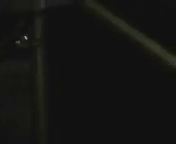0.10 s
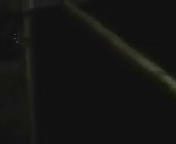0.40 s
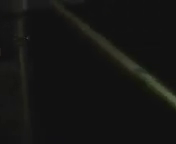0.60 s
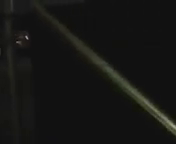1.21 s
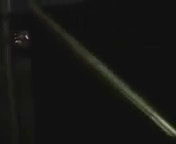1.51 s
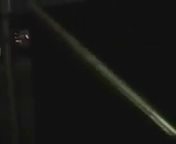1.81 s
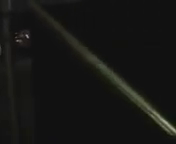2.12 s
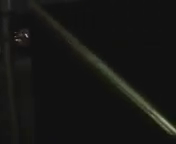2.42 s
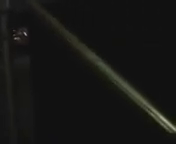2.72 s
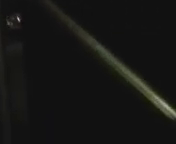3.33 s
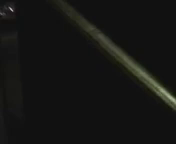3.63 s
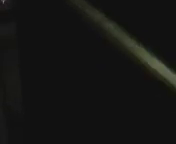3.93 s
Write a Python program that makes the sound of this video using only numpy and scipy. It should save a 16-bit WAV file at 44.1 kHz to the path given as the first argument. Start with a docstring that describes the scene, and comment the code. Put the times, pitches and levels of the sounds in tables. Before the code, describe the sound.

A motorised steel gate rolls along with rapid, irregular knocks and ringing clangs, a chattering chain, rumbling wheels and tiny squeaks. The motor's hum cuts out at about 0.8 seconds. The banging continues, weakening from 1.5 seconds, then settles into small clicks between 2 and 2.7 seconds, with a faint squeak near 2.4. A low distant outdoor rumble and thin, faint hiss remain until 4 seconds.

```python
"""A steel gate knocks and rings as an electric opener pulls it along, chain chattering, motor humming.
Each impact is a burst of noise that excites the damped modes of the frame and its fittings; chain links
ring on the sprocket, dry steel squeaks and the wheels rumble on their track. The motor cuts out,
the gate rolls on, bangs a few times and settles with small clicks and a squeak.
Nearby walls reflect the impacts. A low distant rumble and a thin, faint hiss remain."""
import sys
import numpy as np
from scipy import signal
from scipy.fft import rfft, irfft, next_fast_len
from scipy.io import wavfile
from scipy.ndimage import uniform_filter1d, minimum_filter1d, map_coordinates

SR = 44100
rng = np.random.default_rng(int(sys.argv[2]) if len(sys.argv) > 2 else 0)


def wav_record(signal):
    """Record a signal, one row per channel, as 16-bit PCM in the file named by sys.argv[1]."""
    frames = np.transpose(np.atleast_2d(signal))
    bounded = np.clip(frames, -1, 1)
    # unit amplitude maps onto the largest positive 16-bit level
    quanta = np.round(bounded * 32767).astype(np.int16)
    wavfile.write(sys.argv[1], SR, quanta)


N = 176400

# Impacts: t/s; relative level/dB of frame ring, thud, clang, edge, jingle, sparkle; nominal T60/s
IMPACTS = [(0.023, 3.5, -12, -7, -19.5, -16, -52, 0.082), (0.053, -19, -10, -35, -54, -13, -44, 0.058),
           (0.21, -0.5, -13, -15.5, -18.5, -15.5, -45, 0.11), (0.301, 1, -52, -19, -14, -22, -41, 0.037),
           (0.355, -5.5, -3.5, -9, -33, -16.5, -35, 0.065), (0.412, 0, -19, -10.5, -9.5, -13.5, -30, 0.063),
           (0.43, 2, -11, -28, -2.5, -19, -42, 0.014), (0.527, 3.5, -15, -8, -18, -17, -55, 0.037),
           (0.571, -12, -33, -10, -17, -23, -57, 0.05), (0.58, -4, -4.5, -8, -23, -17, -51, 0.077),
           (0.673, -2, -53, -14, -32, -23, -54, 0.068), (0.697, -2.5, -48, -2.5, -17.5, -34, -37, 0.036),
           (0.727, 5, -32, -19, -25, -15, -35, 0.13), (0.759, -16, -26, -7.5, -17.5, -28, -39, 0.076),
           (0.77, -12, -26, -9, -49, -12, -28, 0.039),
           (0.808, -10.5, -17.5, -14.5, -33, -19.5, -56.5, 0.091),
           (0.91, -2.5, -47, -13.5, -26, -31, -44, 0.063), (0.946, -1, -21, -14, -20, -21, -46, 0.065),
           (0.963, 0, -9, -10, -36, -20, -54, 0.067), (1.029, -4, -29, -9, -20, -14, -40, 0.078),
           (1.047, 5.5, -26, -12, -27, -18.5, -53, 0.071),
           (1.062, -11, -21, -13.5, -26.5, -16.5, -47, 0.08),
           (1.09, -6.5, -11.5, -23, -23, -22, -38, 0.091), (1.177, -4, -37, -16.5, -32, -33, -41, 0.19),
           (1.21, -27, -59, -10.5, -14.5, -17, -30, 0.044), (1.238, 6, -44, -10.5, -17, -13.5, -30.5, 0.12),
           (1.25, 1, -58, -7, -11, -19, -56, 0.057), (1.285, -5, -30, -36, -19.5, -15, -31, 0.06),
           (1.302, 0, -6.5, -6, -15.5, -14.5, -31, 0.077), (1.408, -2, -28, -13.5, -25, -41, -46, 0.075),
           (1.451, -7, -23, -14, -26, -43, -57, 0.051), (1.461, -16, -39, -30, -39, -29, -74, 0.06),
           (1.492, -4, -15, -8.5, -19, -23.5, -48, 0.1), (1.655, -9.5, -34, -14, -25.5, -66, -59, 0.073),
           (1.69, 0, -46, -5.5, -16.5, -13, -63, 0.044), (1.719, -14, -30, -16.5, -39, -22.5, -59, 0.15),
           (1.78, -12, -35, -24.5, -32, -18.5, -39, 0.13), (1.858, -13.5, -33, -18, -33, -40, -48, 0.038),
           (1.905, -8, -38, -23, -27.5, -23.5, -42, 0.12), (2.064, -15.5, -21, -28.5, -33, -28, -54, 0.074),
           (2.256, -40, -30, -41, -46.5, -40, -57, 0.17), (2.283, -17, -36, -25.5, -38, -27, -57, 0.08),
           (2.36, -26, -33, -32.5, -40.5, -38, -55, 0.092), (2.621, -17.5, -17, -26, -36.5, -31, -69, 0.06),
           (2.709, -31, -26, -32.5, -48, -44, -73, 0.071)]
# Spectra of the five noise bands of an impact, low to high: f/Hz, level/dB
THUD = [(40, -28), (90, 0.5), (150, 7), (300, -2), (450, -6), (900, -62)]
CLANG = [(200, -24), (400, -3.5), (620, 1.5), (800, 3), (1000, -5), (1150, -5), (1300, -13.5), (1450, -3.5),
         (1700, -5.5), (2300, -9.5), (4000, -82)]
EDGE = [(1000, -85), (1900, 5.5), (2500, -1), (3200, -4), (4000, -14), (4600, -20), (5500, -39),
        (8000, -53)]
JINGLE = [(3500, -49), (5200, -2.5), (6200, 5.5), (7100, 5.5), (8200, -5), (10000, -19), (13000, -53)]
SPARKLE = [(6000, -13), (8500, 8.5), (10500, 8.5), (12500, -4), (15500, -14)]
# Envelope of each band, in that order: attack/s, multiple of the nominal T60, gain/dB
BAND_ENVELOPES = [(0.0098, 1.3, -6), (0.00069, 1.116, -2.5), (0.0014, 0.93, 1.5), (0.0019, 0.94, -2.5),
                  (0.0011, 1.13, -1)]

def knocks():
    """Impact excitation: a chattering contact radiates noise, loose parts rattle and the steel rings."""
    out, t = np.zeros(N), np.arange(SR) / SR
    bands = (THUD, CLANG, EDGE, JINGLE, SPARKLE)
    weak_modes_hz = np.exp(rng.uniform(np.log(2000), np.log(8200), size=260))
    rattle = amp(-27.5) * decay(t, t60=0.24)
    for start, ring_db, *levels, t60 in IMPACTS:
        chatter = unit_rms(amp(wobble(rate=346, size=SR)))
        for spectrum, db, (attack, stretch, gain_db) in zip(bands, levels, BAND_ENVELOPES):
            contact = chatter * decay(t, stretch * t60)
            envelope = rise(t, attack) * np.hypot(contact, rattle)  # incoherent parts add in power
            add(out, start, amp(db + gain_db) * envelope * noise(spectrum, size=SR))
        _, _, edge_db, jingle_db, _ = levels
        fittings_db = (edge_db + jingle_db) / 2 - 9
        add(out, start, amp(ring_db - 23.5) * frame_ring(t))
        add(out, start, amp(fittings_db) * fittings_ring(weak_modes_hz, t))
    return out

# Normal modes of the frame: f/Hz, level/dB, T60/s
FRAME_MODES = [(432, -4, .22), (621, -2, .26), (694, -7, .2), (872, -5, .22), (959, -3, .32),
               (1062, -2, .28), (1280, -1, .15), (1345, -3, .17), (1567, -8, .7), (1599, -12.5, 1.25),
               (1665, -6, .4), (1781, -9, .45), (2003, -5, .18), (2444, -8, .2), (2584, -10, .22),
               (3268, -16, .2)]

def frame_ring(t):
    """Modal superposition: every blow excites the same modes of the frame in new proportions."""
    return ring(FRAME_MODES, t, scatter_db=3)

# Normal modes of the small steel fittings: f/Hz, level/dB, T60/s
FITTING_MODES = [(4494, -13.5, 0.28), (4597, -12.5, 0.28), (5900, -11, 0.22), (6500, -4, 0.13),
                 (7040, -3, 0.18), (6850, 1, 0.081), (8160, -16, 0.2), (8730, -18, 0.26), (8920, -20, 0.26)]

def fittings_ring(weak_modes_hz, t):
    """High modal density: a crowd of weak modes merges into a shimmer around a few distinct ones."""
    distinct = ring(FITTING_MODES, t, scatter_db=3)
    has_mode = np.bincount((weak_modes_hz * len(t) / SR).astype(int), minlength=len(t) // 2 + 1) > 0
    shimmer = filtered_noise(has_mode, len(t)) * decay(t, t60=0.2) * rise(t, attack=0.002)
    return distinct + amp(-1.5) * shimmer

# Hollow clunks of the frame: t/s, f/Hz, level/dB
CLUNKS = [(0.023, 616, -19), (0.21, 720, -17.5), (0.301, 1058, -23), (0.413, 1643, -22),
          (0.429, 1781, -19.5), (0.527, 1350, -16), (0.574, 149, -13), (0.579, 1781, -17),
          (0.963, 1059, -20.5), (1.032, 625, -16), (1.245, 426, -15.5), (1.249, 1327, -14.5),
          (1.301, 1310, -30), (1.494, 607, -18.5), (1.492, 1964, -18), (1.493, 1600, -28.5),
          (1.688, 1334, -24.5)]

def clunks():
    """Selective excitation: the point of impact favours one resonance, damped like the frame's modes."""
    out, t = np.zeros(N), np.arange(SR) / SR
    frame_t60s = [(hz, t60) for hz, _, t60 in FRAME_MODES]
    for start, hz, db in CLUNKS:
        add(out, start, ring([(hz, db, log_interp(frame_t60s, hz))], t, scatter_db=0))
    return out

# Steel-on-steel cracks that open a knock: t/s, level/dB, peak f/Hz
CRACKS = [(0.302, -7, 1062), (0.4135, -11.5, 1570), (0.528, -15, 1300), (0.581, -11.5, 1750),
          (0.696, -5, 1890), (0.9643, -10, 1070), (1.0314, -10.5, 1530), (1.238, -12, 1280),
          (1.3035, -4, 1350), (1.4925, -15, 1840), (1.69, -10.5, 1250), (2.064, -24, 964),
          (2.283, -26, 916), (2.621, -26.5, 970)]
# Spectrum of a crack: multiple of the peak frequency, level/dB
CRACK_SPECTRUM = [(.23, -11), (.6, -27), (1, 28), (1.5, -2.5), (2.5, -20), (4.6, -20), (7, -28), (10, -55)]

def cracks():
    """Hard contact: a steep, quickly damped transient, its energy gathered around one frequency."""
    out, t = np.zeros(N), np.arange(SR // 10) / SR
    rise_s = 0.0008
    envelope = (1 - np.exp(-(t / rise_s) ** 2)) * decay(t, t60=0.042)
    for start, db, hz in CRACKS:
        spectrum = [(multiple * hz, level) for multiple, level in CRACK_SPECTRUM]
        add(out, start, amp(db) * envelope * noise(spectrum, size=len(t)))
    return out

# Separate slaps of the chain: t/s, relative level/dB, f/Hz
CHAIN_SLAPS = [(0.0214, -8.5, 7040), (0.064, -14.5, 6650), (0.0745, -11, 7400), (0.0905, -14, 7070),
               (0.117, -14.5, 6950), (0.2014, -5.5, 7070), (0.2162, -8, 6800), (0.258, -8.5, 6900),
               (0.2864, -12, 7000), (0.4419, -28, 6800), (0.455, -10.5, 7300), (0.472, -9.5, 7240),
               (0.4827, -10.5, 7000), (0.5122, -36, 7090), (0.5548, -13, 7000), (0.568, -13, 7140),
               (0.5823, -18, 7200), (0.611, -14, 7400), (0.624, -11.5, 6900), (0.6378, -9.5, 7050),
               (0.666, -15, 6800), (0.694, -11, 6870), (0.707, -16, 6760), (0.725, -8.5, 7500),
               (0.8091, -11.5, 6900), (0.862, -21, 7500), (0.884, -21, 7300), (0.9988, -20.5, 6860),
               (1.089, -12.5, 6750), (1.693, -10, 7080), (1.907, -14.5, 6160), (3.038, -45, 7000),
               (3.0914, -48, 7040)]

def chain():
    """Meshing impacts: links strike the sprocket almost periodically under drive; some slap harder."""
    out = np.zeros(N)
    mesh_hz, ring_hz = 73.2, 6900
    for link, (lag, force, detune) in enumerate(rng.standard_normal((80, 3))):
        start = (link + 0.23 * lag) / mesh_hz
        add(out, start, drive(start) * amp(-24 + 2.5 * force) * clink(ring_hz * (1 + 0.012 * detune)))
    for start, db, hz in CHAIN_SLAPS:
        add(out, start, amp(db - 2.5) * clink(hz))
    return out

def clink(hz, half_width_hz=503):
    """Modal overlap: the close high modes of a link ring as one narrow band of noise."""
    t = np.arange(SR // 10) / SR
    f = np.fft.rfftfreq(len(t), 1 / SR)
    resonance = 1 / (1 + ((f - hz) / half_width_hz) ** 2)
    return filtered_noise(resonance, len(t)) * decay(t, t60=0.04) * rise(t, attack=0.00072)

# Squeaks: t/s, duration/s, f/Hz, level/dB, attenuation of the second harmonic/dB
SQUEAKS = [(0.004, 0.018, 5730, -16, 40), (0.233, 0.021, 5780, -18.5, 39), (0.31, 0.06, 8860, -32.5, 30),
           (0.333, 0.025, 12150, -36, 30), (0.968, 0.02, 7840, -24.5, 30), (1.578, 0.014, 3070, -32, 30),
           (2.423, 0.05, 5054, -36.5, 6)]

def squeaks(sag=0.024, jitter=0.012, top_hz=15500):
    """Friction-induced vibration: dry steel rubs on steel in brief, slightly falling whistles."""
    out = np.zeros(N)
    for start, duration, hz, db, rolloff_db in SQUEAKS:
        progress = np.linspace(0, 1, int(duration * SR))
        pitch = hz * (1 + sag * (0.5 - progress) + jitter * wobble(rate=920, size=len(progress)))
        phase = 2 * np.pi * np.cumsum(pitch) / SR
        harmonics = [k for k in (1, 2, 3) if k * hz < top_hz]
        tone = sum(amp(db - (k - 1) ** 2 * rolloff_db) * np.sin(k * phase) for k in harmonics)
        add(out, start, np.sin(np.pi * np.sqrt(progress)) * tone)
    return out

# Partials of the motor: multiple of the hum frequency, level/dB
MOTOR_PARTIALS = [(1, -26), (1.998, -28.5), (2.52, -33.5)]

def motor(hum_hz=120):
    """Forced vibration: mains hum and a weaker running tone, a little unsteady under load."""
    pitch = hum_hz * (1 + 0.0096 * wobble(rate=10.9))
    phase = 2 * np.pi * np.cumsum(pitch) / SR
    hum = sum(amp(db + 2.4 * wobble(rate=10.6)) * np.sin(ratio * phase) for ratio, db in MOTOR_PARTIALS)
    return drive(np.arange(N) / SR) * hum

def drive(t, cut_s=0.68, run_down_s=0.12):
    """Run-down: the motor's effort is full until the cut, then falls along a Gaussian curve."""
    return np.exp(-(np.maximum(t - cut_s, 0) / run_down_s) ** 2)

# Course of the rolling: t/s, rumble level/dB, grind level/dB, rustle level/dB
ROLLING_LEVELS = [(0, -26, -24.5, -27.5), (.45, -35, -27.5, -34.5), (.8, -27, -25.5, -31.5),
                  (.9, -33, -30, -37.5), (1.35, -33, -29, -37), (1.64, -38.5, -37, -44),
                  (1.85, -49, -45, -38.5), (2.148, -52, -47, -54.5), (2.7, -65, -44.5, -59.5),
                  (4, -62.5, -99, -78)]
# Spectra of the wheels' rumble and grind and the chain's rustle: f/Hz, level/dB
RUMBLE = [(25, -42), (40, -40), (62, 13), (90, 7), (150, 12), (300, 10.5), (500, 4), (1000, -46)]
GRIND = [(200, 1.5), (430, -8.5), (650, 5.5), (1100, -5.5), (1800, -5), (2600, -10.5), (4000, -38),
         (6000, -53), (12000, -62)]
RUSTLE = [(3000, -2.5), (5000, -8), (6200, -1), (7000, 7.5), (8000, -4), (10000, -15.5), (15000, -32)]

def rolling():
    """Rolling noise: wheels rumble and grind unevenly on the track while the slack chain rustles."""
    bumps_db = 2.33 * wobble(rate=70)
    layers = zip(level_curves(ROLLING_LEVELS), (RUMBLE, GRIND, RUSTLE))
    return sum(amp(db + bumps_db + 1.36 * wobble(rate=26.64)) * noise(band) for db, band in layers)

# Reverberation time of the yard: f/Hz, T60/s
YARD_T60 = [(150, 0.27), (2000, 0.14), (7000, 0.2), (14000, 0.31)]

def yard_reverb(x):
    """Reverberation: reflections from nearby walls form a short tail with frequency-dependent decay."""
    hz, t, spectra = signal.stft(rng.standard_normal(SR // 2), SR, nperseg=256)
    _, tail = signal.istft(spectra * decay(t, log_interp(YARD_T60, hz)[:, None]), SR, nperseg=256)
    delayed = np.pad(x, (300, 0))
    return signal.fftconvolve(delayed, tail / np.linalg.norm(tail))[:N]

# Spectra of the distant rumble and the hiss: f/Hz, level/dB
DISTANT_RUMBLE = [(20, -21), (32, -5), (55, 2), (90, 2.5), (130, 1), (260, -4), (380, -8), (520, -14),
                  (900, -12.5), (1250, -17.5), (2000, -26), (3100, -33.5), (4000, -52), (4900, -56),
                  (8500, -55), (15500, -49.5)]
HISS = [(4900, -21), (5700, -6), (6500, -3), (7050, 2.5), (7400, -3), (7900, -14), (9500, -22)]
# Course of the hiss: t/s, level/dB
HISS_LEVELS = [(0, -62), (3.05, -61.5), (3.4, -65.5), (3.75, -62.5), (4, -56)]

def background():
    """Ambient noise: a nearly steady distant rumble under a thin, flickering band of hiss."""
    hiss_db, = level_curves(HISS_LEVELS)
    rumble = amp(-37 + 0.12 * wobble(rate=6)) * noise(DISTANT_RUMBLE)
    hiss = amp(hiss_db + 2.9 * wobble(rate=27)) * noise(HISS)
    return rumble + hiss

def ring(modes, t, scatter_db):
    """Free vibration: a sum of damped sinusoids, whose phase wavers because the joints are loose."""
    waver_rad = 0.2 * wobble(rate=75, size=len(t))
    tone = np.zeros(len(t))
    for hz, db, t60 in modes:
        envelope = amp(db + scatter_db * rng.normal()) * decay(t, t60)
        tone += envelope * np.sin(2 * np.pi * (hz * t + rng.random()) + waver_rad)
    return tone * rise(t, attack=0.002)

def amp(db):
    """Amplitude ratio of a level in decibels."""
    return 10 ** (np.asarray(db) / 20)

def unit_rms(x):
    """Normalisation to rms 1."""
    return x / np.sqrt(np.mean(x ** 2) + 1e-20)

def log_interp(points, hz):
    """Interpolation of (f/Hz, value) points on a logarithmic frequency axis."""
    f, values = np.transpose(points)
    return np.interp(np.log(hz + 1), np.log(f + 1), values)

def level_curves(rows):
    """Linear interpolation of each level column to one value per sample."""
    times, *columns = np.transpose(rows)
    return [np.interp(np.arange(N) / SR, times, column) for column in columns]

def wobble(rate, size=N):
    """Random modulation: a spline through rate Gaussian knots a second."""
    return map_coordinates(rng.standard_normal(4096), [np.arange(size) * rate / SR], mode="wrap")

def filtered_noise(gains, size):
    """Spectral shaping: white noise weighted bin by bin, scaled to rms 1."""
    return unit_rms(irfft(rfft(rng.standard_normal(size)) * gains, size))

def noise(spectrum, size=N):
    """Coloured noise of rms 1, shaped by (f/Hz, level/dB) points."""
    return filtered_noise(amp(log_interp(spectrum, np.fft.rfftfreq(size, 1 / SR))), size)

def rise(t, attack):
    """Exponential onset with time constant attack/s."""
    return 1 - np.exp(-t / attack)

def decay(t, t60):
    """Exponential damping: 60 dB in t60 seconds."""
    return np.exp(-np.log(1000) * t / t60)

def add(track, start, sound):
    """Superposition of a sound on the track at time start/s."""
    part = track[max(0, round(start * SR)):][:len(sound)]
    part += sound[:len(part)]

def scene():
    """Superposition in mono: the gate, its reflections, motor, wheels and background."""
    gate = knocks() + clunks() + cracks() + chain() + squeaks()
    return (gate + amp(-10.5) * yard_reverb(gate) + motor() + rolling() + background())[None]

def record(dry):
    """Band and peak limiting: deep bass is thinned, high peaks are held down, the top treble is cut."""
    low_cut_hz, top_hz, ceiling, window_s = 54, 15700, 0.95, 0.004
    x = signal.sosfilt(signal.butter(4, low_cut_hz, "highpass", fs=SR, output="sos"), dry)
    window = int(window_s * SR)
    gain = minimum_filter1d(ceiling / np.maximum(np.abs(x), ceiling), window)
    smooth_gain = uniform_filter1d(uniform_filter1d(gain, window // 2), window // 2)
    size = next_fast_len(N + SR // 2)
    passband = np.fft.rfftfreq(size, 1 / SR) < top_hz
    return irfft(rfft(x * smooth_gain, size) * passband, size)[..., :N]

dry = scene()
out = record(dry)
wav_record(out)
```